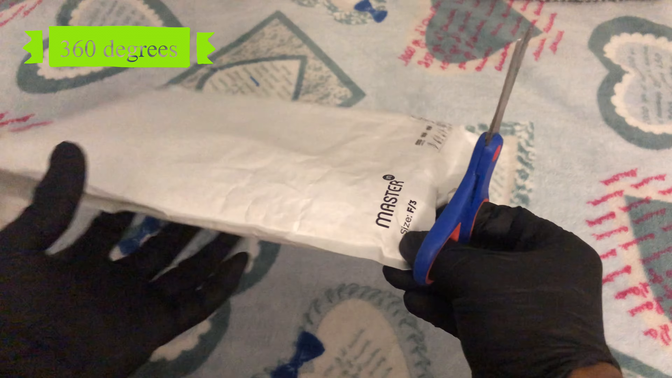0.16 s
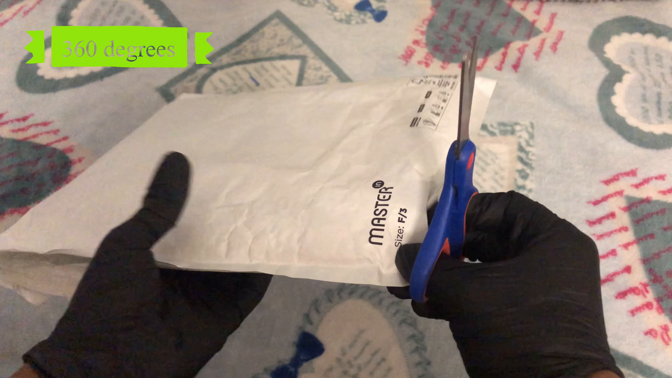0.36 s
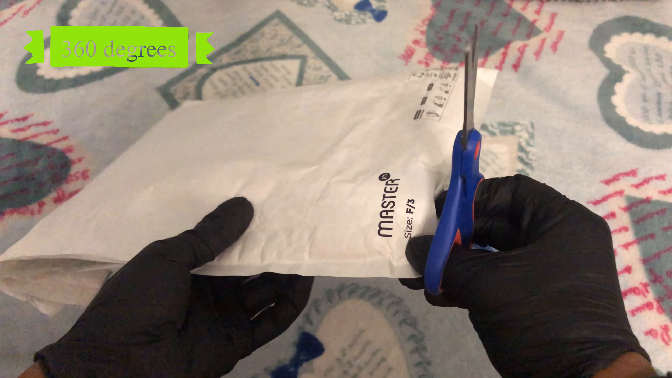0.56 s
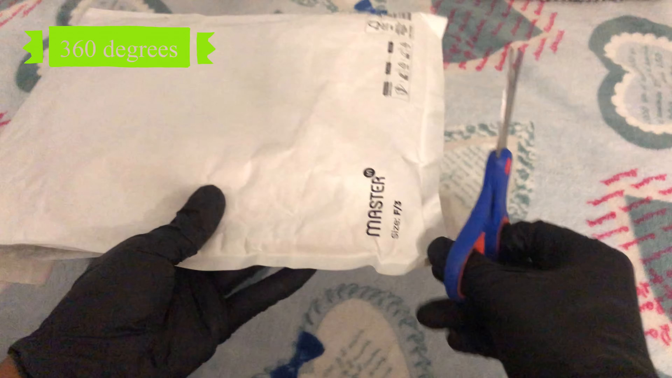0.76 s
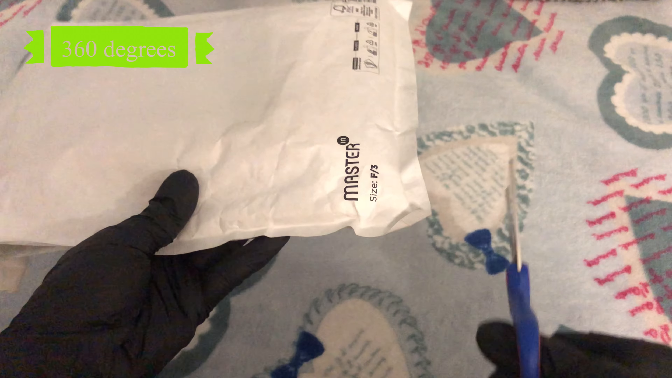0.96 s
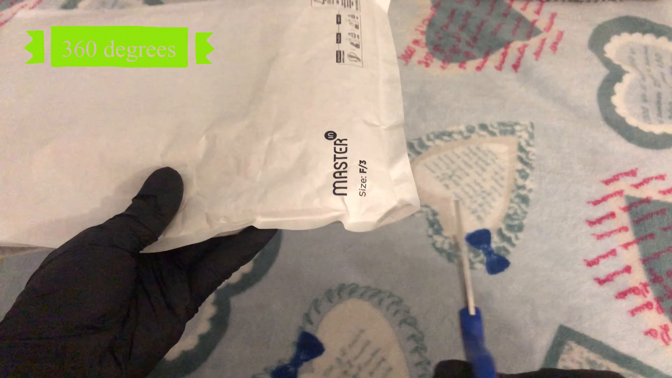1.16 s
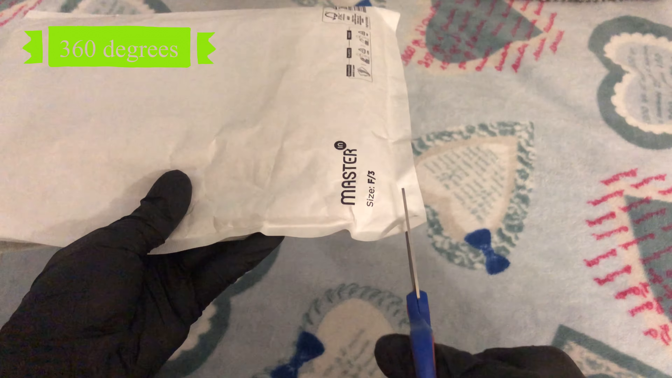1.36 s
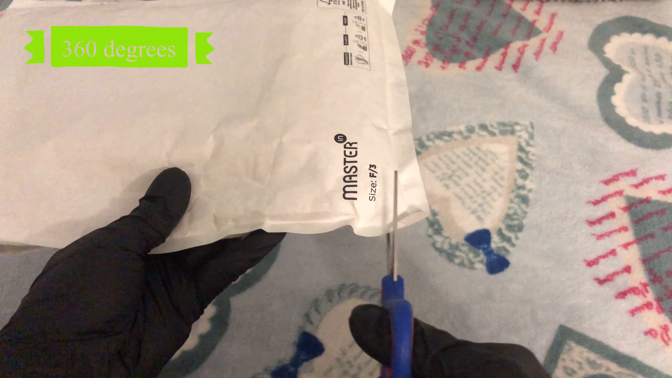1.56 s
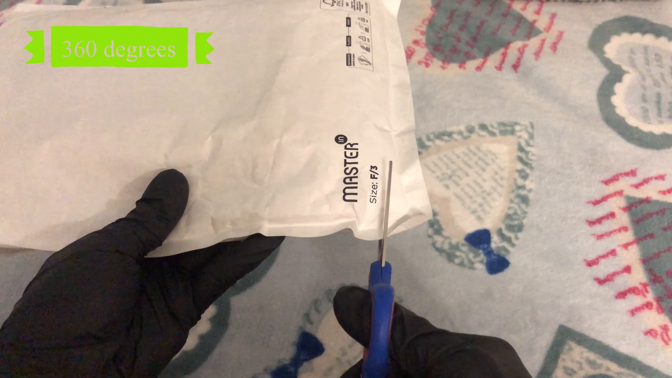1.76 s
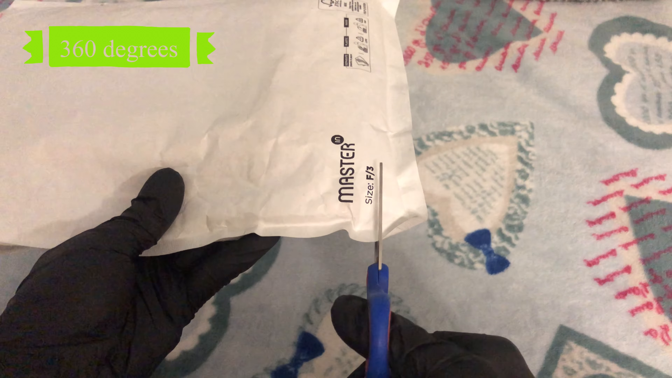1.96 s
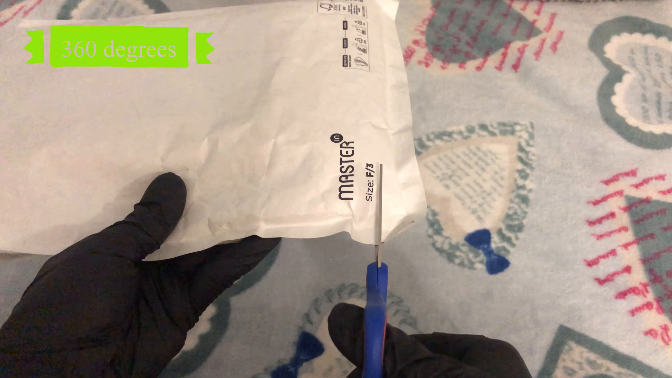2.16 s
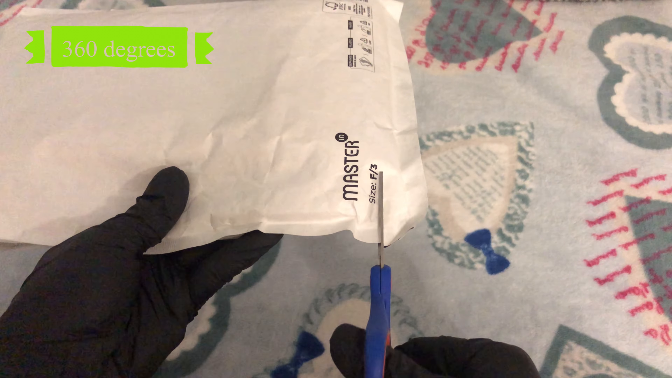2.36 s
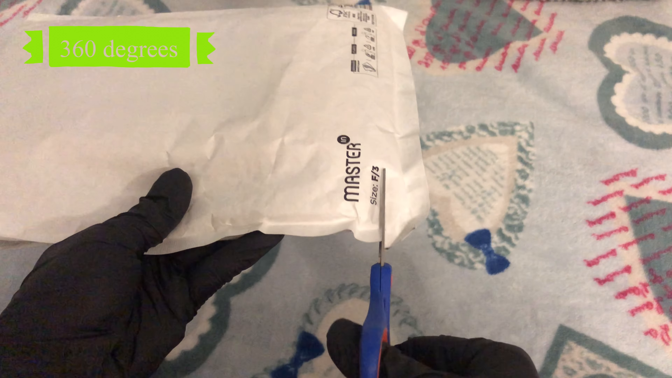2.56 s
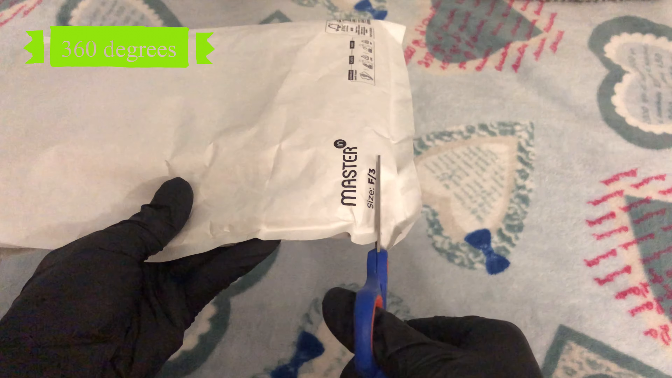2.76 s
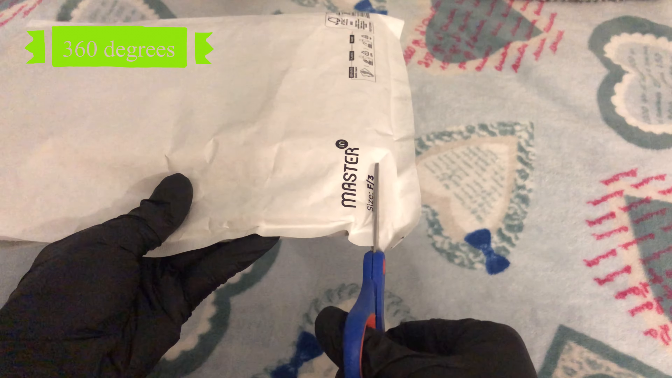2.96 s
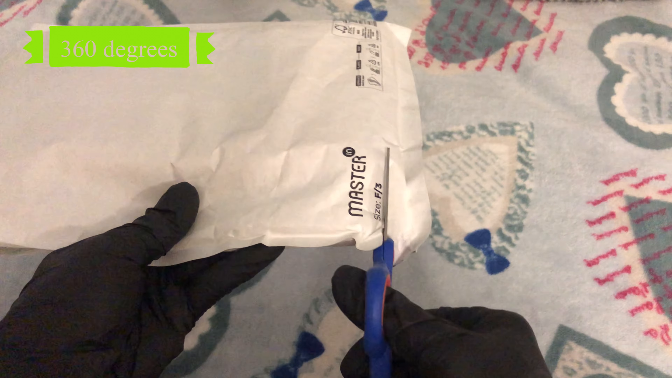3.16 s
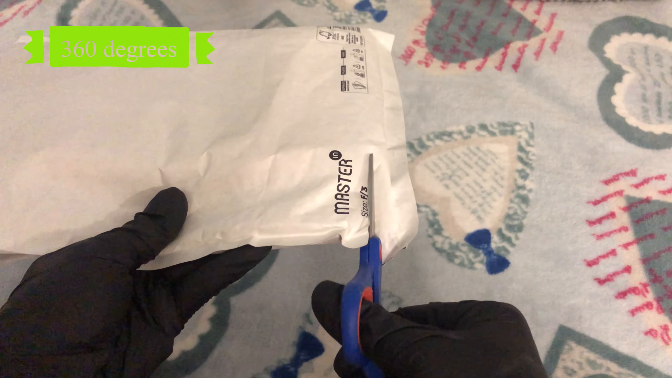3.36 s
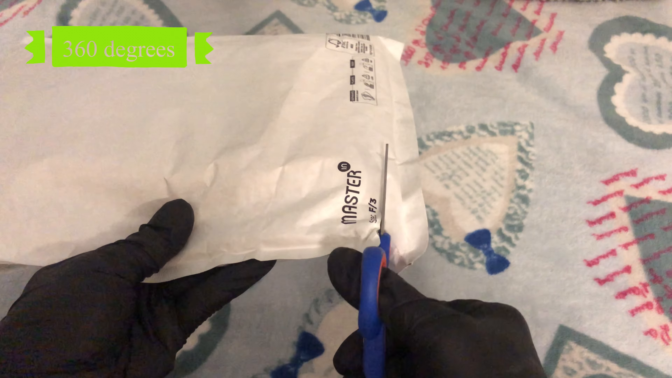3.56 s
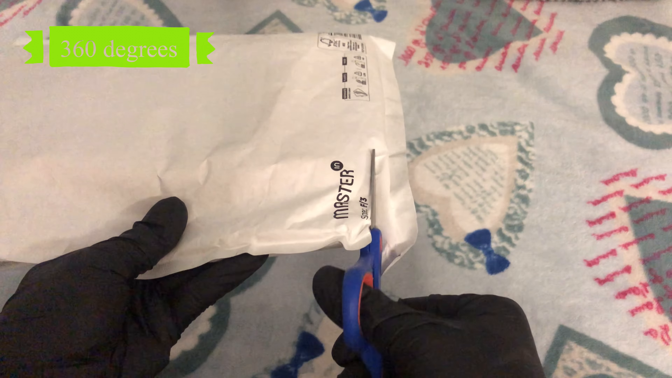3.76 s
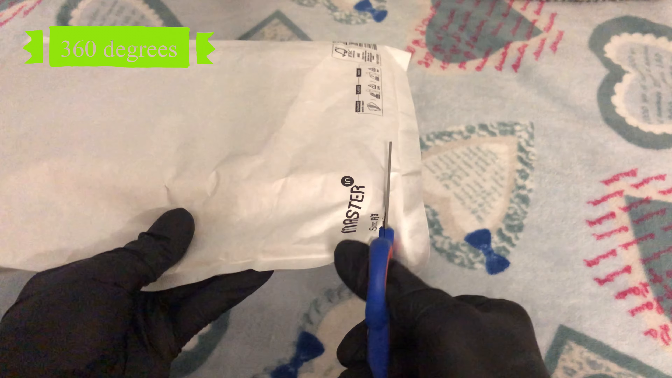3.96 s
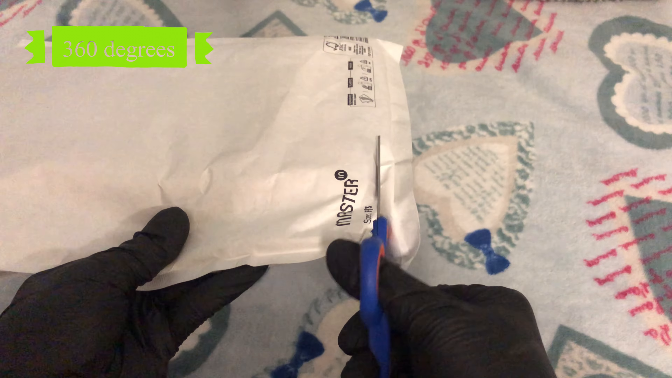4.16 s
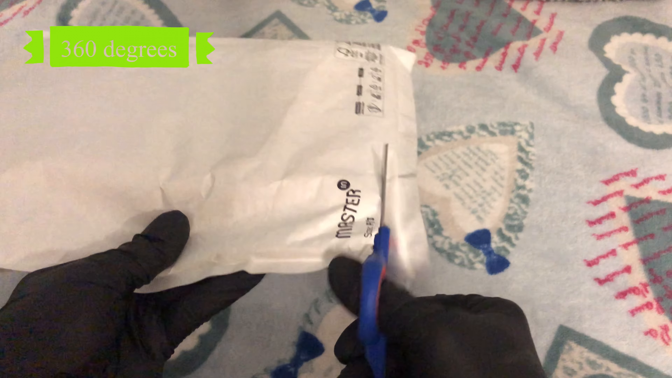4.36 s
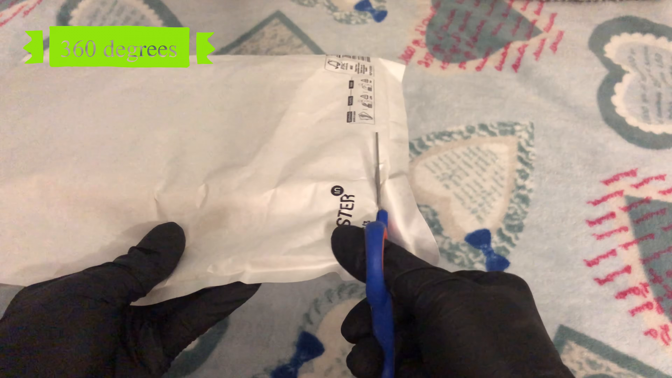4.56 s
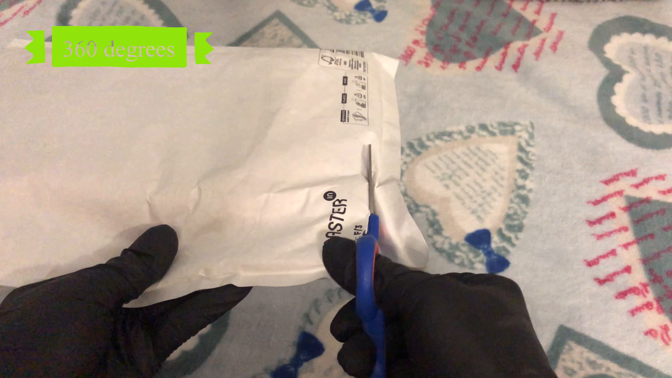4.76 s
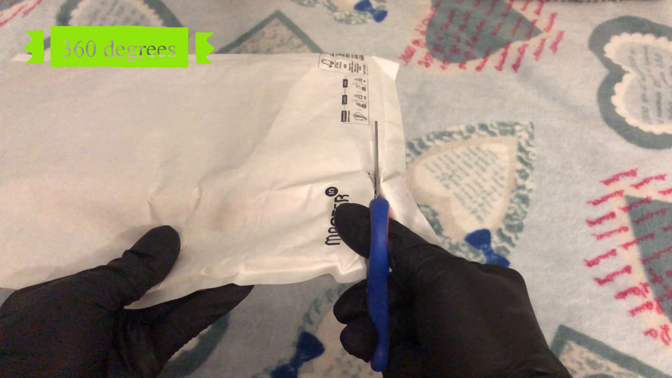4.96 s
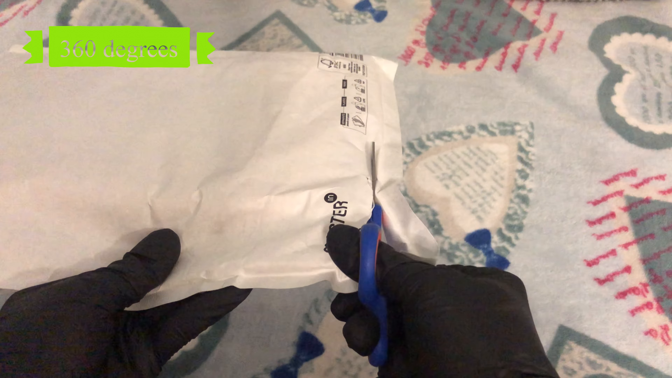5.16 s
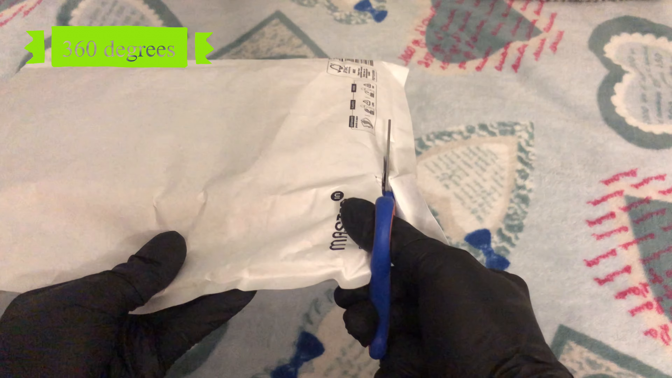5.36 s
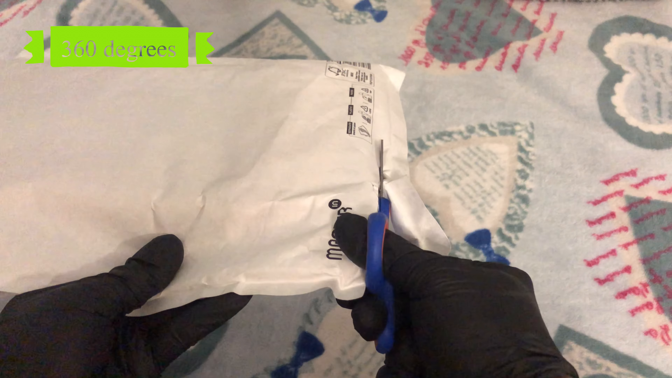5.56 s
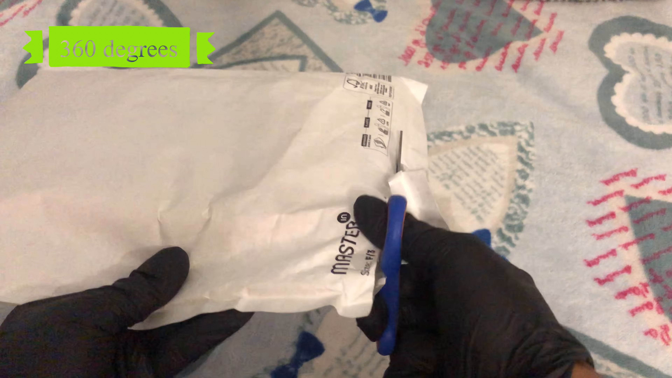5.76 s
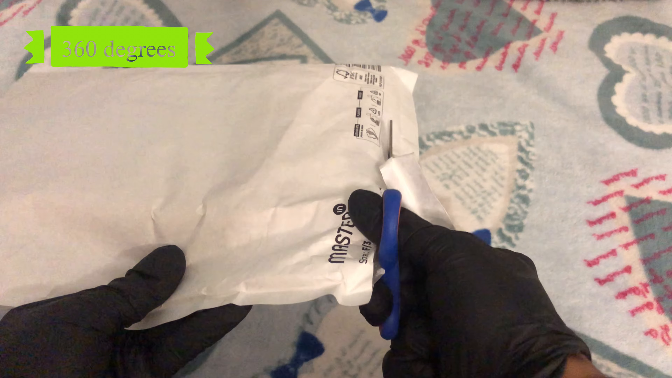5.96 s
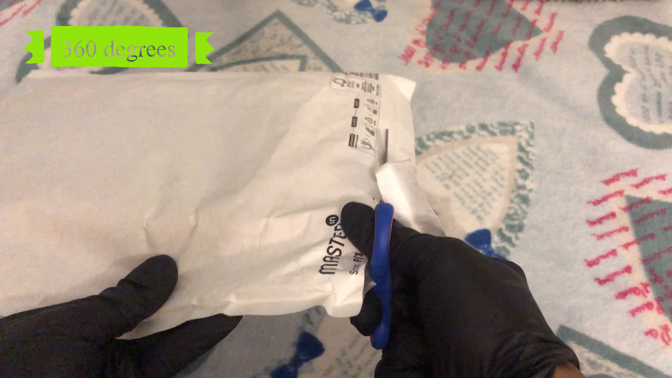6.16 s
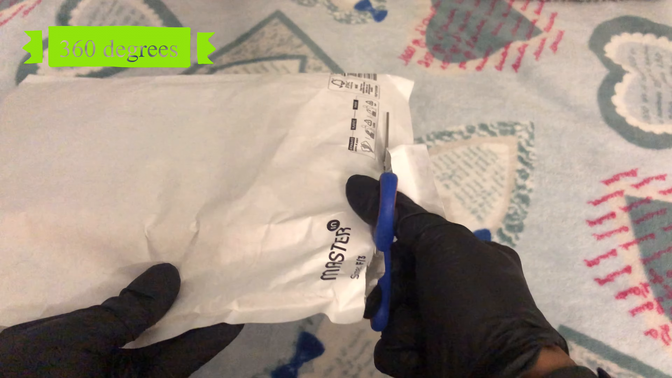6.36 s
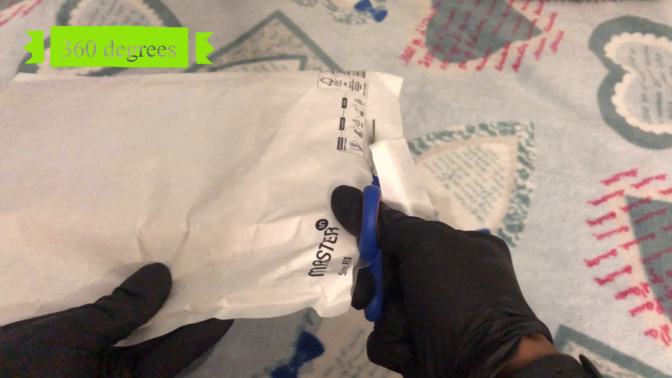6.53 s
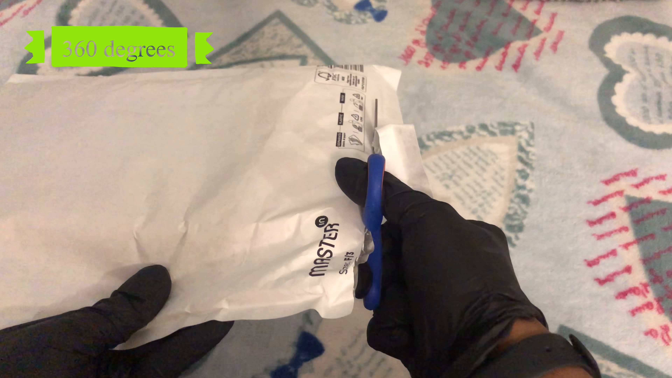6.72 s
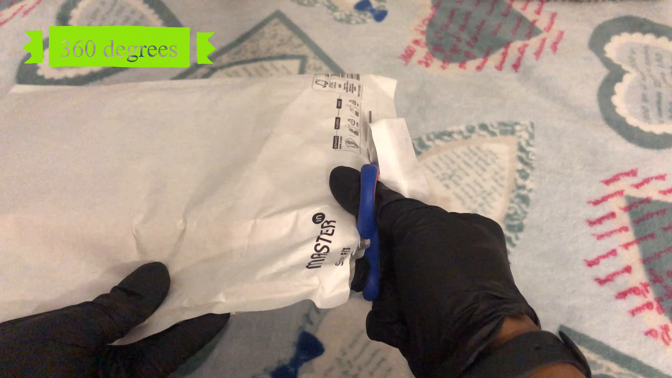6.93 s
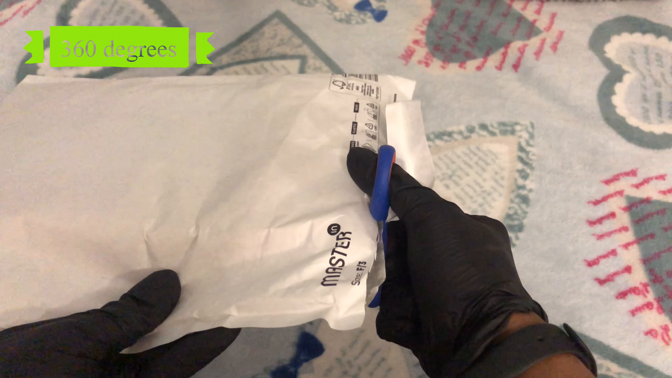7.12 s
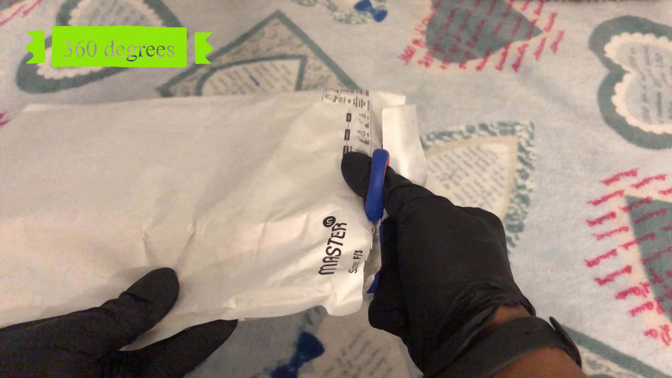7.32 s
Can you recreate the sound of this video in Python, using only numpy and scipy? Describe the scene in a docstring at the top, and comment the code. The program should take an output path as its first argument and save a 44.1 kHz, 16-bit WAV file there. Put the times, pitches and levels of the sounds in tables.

```python
"""Scissors cut open a padded paper mailer over a quilt, after gloved hands have turned it over.
Each closing of the blades shears paper and bubble film in a dense crunch. Creases buckle with sharp
snaps whose low part travels slowly through the sheet and arrives late. Before the cutting, the pivot
creaks once and the blades scrape the rim. The film ticks faintly, all in a quiet, soft room."""
import sys
import numpy as np
from scipy import signal
from scipy.fft import rfft, irfft, next_fast_len
from scipy.io import wavfile

SR = 44100
rng = np.random.default_rng(int(sys.argv[2]) if len(sys.argv) > 2 else 0)


def transcribe(signal):
    """Save signal, clipped to [-1, 1], as a 16-bit WAV file at the path in sys.argv[1]."""
    frames = np.atleast_2d(signal).T
    limited = np.clip(frames, -1, 1)
    pcm = np.round(limited * 32767).astype(np.int16)
    wavfile.write(sys.argv[1], SR, pcm)


N = 330309
GRAIN = 1024   # samples in one snap
BEND_LAG_S = 0.002166   # scales how far low notes trail high ones in the sheet

# Closings of the blades. Crunch is the middle range, thud the low range, sizzle the high range.
# bite t/s, hold/s, crunch level/dB, thud over crunch/dB, sizzle over crunch/dB, air pocket f/Hz
STROKES = [(1.586, 0.043, -65, -29, -3, 454), (2.117, 0.018, -56.5, -6, -2, 620),
           (2.196, 0.056, -62, -8, 2.5, 634), (2.294, 0.11, -53.5, -9, 2.5, 543),
           (2.566, 0.072, -42.5, -6.5, 2, 660), (2.806, 0.096, -47.5, -4, 3.5, 720),
           (3.045, 0.041, -41, -6, 2.5, 680), (3.249, 0.11, -47, -6, 2.5, 640),
           (3.459, 0.074, -45, -9, 4, 716), (3.67, 0.1, -44.5, -6, 1.5, 460),
           (3.906, 0.039, -38, -8.5, 3, 710), (4.165, 0.079, -43, -5, 2, 460),
           (4.357, 0.061, -43.5, -5.5, 4, 570), (4.575, 0.054, -41.5, -7, 2.5, 440),
           (4.775, 0.074, -49.5, -3.5, 4.5, 760), (5.035, 0.067, -40.5, -5, 4, 490),
           (5.22, 0.079, -47, -2.5, 4.5, 770), (5.537, 0.0, -29.5, -7, 4.5, 337),
           (5.692, 0.06, -46, -5.5, 3.5, 784), (5.934, 0.079, -50.5, -2, 5, 480),
           (6.145, 0.071, -46.5, -6.5, 5, 520), (6.395, 0.0006, -32, -5, 3.5, 430),
           (6.572, 0.027, -44.5, -8, 4, 504), (6.837, 0.053, -46, -4, 3, 348),
           (7.022, 0.038, -43, -6.5, 5, 487), (7.257, 0.059, -43.5, -3.5, 5, 445),
           (7.452, 0.1, -43, -6, 3, 724)]


def from_db(db):
    """Turn decibels into a gain to multiply by."""
    return 10 ** (np.asarray(db) / 20)


def rms_one(x):
    """Scale x to an average strength (rms) of 1."""
    return x / np.sqrt(np.mean(x ** 2) + 1e-20)


def coloured(x, points):
    """Shape the tone of x with a curve of (f/Hz, level/dB) points; the result has rms 1."""
    size = next_fast_len(N)
    hz = np.maximum(np.arange(size // 2 + 1) * SR / size, 1)
    point_hz, point_db = np.transpose(points)
    gain = from_db(np.interp(np.log(hz), np.log(point_hz), point_db))
    return rms_one(irfft(rfft(x, size) * gain, size)[:N])


def drift(rate_hz):
    """A smooth random wander with rms 1."""
    r = np.exp(-2 * np.pi * rate_hz / SR)
    return rms_one(signal.lfilter([1], [1, -2 * r, r * r], rng.standard_normal(N + SR))[SR:])


def passed(x, kind, hz):
    """Keep the "low" part, the "high" part or one "band" of x."""
    return signal.sosfilt(signal.butter(2, hz, kind, fs=SR, output="sos"), x)


def ringing(x, pitch_hz, width):
    """Let x ring at a moving pitch; width is a share of that pitch."""
    ring, state, block = np.zeros(N), np.zeros(2), 256
    for i, hz in zip(range(0, N, block), pitch_hz[::block]):
        r = np.exp(-np.pi * width * hz / SR)
        feed = [(1 - r * r) / 2, 0, (r * r - 1) / 2]
        feedback = [1, -2 * r * np.cos(2 * np.pi * hz / SR), r * r]
        ring[i:i + block], state = signal.lfilter(feed, feedback, x[i:i + block], zi=state)
    return ring


def hush():
    """A faint, steady, low noise lies under everything."""
    # Tone of the hush: f/Hz, level/dB
    tone = [(18, -47), (30, -7), (153, -1.5), (889, -16.5), (1100, -12.5), (1390, -16), (6380, -28),
            (14400, -35), (16000, -61)]
    return from_db(-66) * coloured(rng.standard_normal(N), tone)


def room(x, fade_s=0.27):
    """The echo of a softly furnished room: a tail of noise that falls 60 dB in fade_s."""
    t = np.arange(SR // 2) / SR
    tail = passed(rng.standard_normal(len(t)), "low", 18000) * from_db(-60 * t / fade_s) * (t > .003)
    return signal.oaconvolve(x, tail / np.sqrt(np.sum(tail ** 2)))[:N]


def buckle(noise, decay_s):
    """A crease gives way in a short dying rattle."""
    return noise * np.exp(-np.arange(GRAIN) / SR / decay_s)


def film_ticks(typical_per_s=70):
    """The held film keeps settling in clumps of faint, bright ticks of uneven size."""
    born = rng.random(N) < typical_per_s * from_db(5 * drift(8)) / SR
    sizes = from_db(-54 + 2.9 * rng.standard_normal(N))
    pitch_index = rng.integers(0, 8, N)
    out = 0
    for k, hz in enumerate(np.geomspace(2800, 9000, 8)):
        tick = passed(buckle(rng.standard_normal(GRAIN), decay_s=0.00031), "band", [hz / 1.56, hz * 1.3])
        out += signal.oaconvolve(sizes * born * (pitch_index == k), tick / np.abs(tick).max())[:N]
    return out


def pivot_creak():
    """The blades stick and slip on their screw; each slip rings a little differently, over a rough rub."""
    # Slips of the pivot: t/s, level/dB
    slips = [(1.1539, -40.5), (1.1611, -41.5), (1.1675, -45), (1.1743, -45), (1.1806, -45), (1.188, -41),
             (1.2024, -42)]
    # Notes the scissors ring at: f/Hz, level added to the slip/dB, time to fall 60 dB/s
    notes = [(1850, -16, 0.012), (2130, -7, 0.011), (3120, 17, 0.0035), (4900, 4, 0.0024),
             (6800, 15, 0.0027)]
    at = [round(s * SR) for s, _ in slips]
    uneven_db = rng.normal(0, 2.4, (len(slips), len(notes)))
    ring = 0
    for (hz, db, fade_s), spread_db in zip(notes, uneven_db.T):
        clicks = np.zeros(N)
        clicks[at] = from_db(np.array(slips)[:, 1] + db + spread_db)
        r, w = from_db(-60 / (fade_s * SR)), 2 * np.pi * hz / SR
        ring += signal.lfilter([0, np.sin(w)], [1, -2 * r * np.cos(w), r * r], clicks + 1e-18)
    rubbing = np.zeros(N)
    rubbing[at[0]:at[-1] + GRAIN // 2] = from_db(-59)
    rub = passed(rubbing * rng.standard_normal(N), "band", [800, 7000])
    bright_edge = from_db(-16) * ring
    return passed(ring, "band", [1650, 2250]) + bright_edge + rub


def rim_scrapes(edge_s=0.002):
    """Steel rubs the stiff rim: an uneven hollow rasp that starts and stops at once."""
    # The open blades slide onto the rim: t/s, length/s, level/dB
    slides = [(1.519, 0.012, -46.5), (1.541, 0.067, -43), (1.725, 0.06, -50.5)]
    # Tone of the rim: f/Hz, level/dB
    tone = [(120, -41), (200, -11), (448, -15.5), (1140, -2.5), (1480, -8), (1770, 0.5), (2250, -15),
            (2860, -11), (4520, -18), (7540, -22), (16000, -43)]
    t = np.arange(N) / SR
    rubbing = sum(from_db(db) * np.clip(np.minimum(t - s, s + length - t) / edge_s, 0, 1)
                  for s, length, db in slides)
    return rubbing * from_db(2.0 * drift(95)) * coloured(rng.standard_normal(N), tone)


def through_sheet(burst, lag_s):
    """Low notes travel more slowly through a bending sheet, so a burst leaves as a falling chirp."""
    hz = np.arange(GRAIN // 2 + 1) * SR / GRAIN
    delay = np.exp(-4j * np.pi * lag_s * (np.sqrt(1000 * hz) - hz / 9.4))
    return irfft(rfft(burst) * delay, GRAIN)


def pocket_hz():
    """The trapped air pocket changes pitch with the grip, stroke by stroke."""
    bite_s, *_, pitch_hz = np.transpose(STROKES)
    return np.interp(np.arange(N) / SR, bite_s, pitch_hz)


def mailer_body(x):
    """The rustle rings in the air pocket and in panels of the sheet, whose pitch wanders as they bend."""
    # Ringing panels: f/Hz, wander/octaves, width/share of pitch, level/dB
    panels = [(1547, 0.26, 0.12, 5), (4000, 0.29, 0.33, 1.5)]
    panel_ring = sum(from_db(db) * ringing(x, hz * 2 ** np.clip(octaves * drift(4.8), -1, 1), width)
                     for hz, octaves, width, db in panels)
    return x + panel_ring + 2 * from_db(-4) * ringing(x, pocket_hz(), width=0.43)


def crease_snaps(crack_cycles=0.44, film_s=0.0005):
    """Each crease gives a short crack with a faint rattle, a late air pocket thud and a tick of film."""
    # Buckling creases: t/s, crack level/dB, f/Hz, thud over crack/dB, tick over crack/dB
    creases = [(0.21, -23.5, 1260, -8, -11), (0.2362, -23.5, 2600, -4, -20), (0.2639, -29, 2080, -7, -22),
               (0.3627, -42, 905, 6, -15), (0.5536, -22, 2760, -38, -16), (0.5904, -36, 3400, -32, -12),
               (0.6103, -21, 1940, -9.5, -6), (0.6392, -26.5, 2540, -14, -23), (0.6728, -37, 2450, -24, -8),
               (0.6958, -35, 840, -1.5, -1), (0.7444, -21, 1940, -14, -7), (0.8452, -28.5, 1960, -15, -11),
               (0.8661, -24, 2440, -43, -4.5), (0.8894, -25, 1720, -8, -30), (0.985, -38.5, 1520, -6, -34),
               (1.2228, -36, 4420, -15, 0.5), (1.3639, -40.5, 5000, -30, -3), (1.485, -40, 3930, -27, -18),
               (1.6839, -39, 4300, -13.5, -11), (1.8348, -45, 2200, -8, -2), (2.021, -41, 3900, -36, -10),
               (2.0388, -43.5, 1880, -8, -18), (2.0529, -40.5, 2230, -9, -6),
               (2.1087, -33.5, 1650, -29, -9), (2.144, -18, 2430, -9, -42), (2.205, -39, 2230, -34, -21),
               (2.239, -40.5, 6730, -34, 1), (2.3457, -18.5, 4180, -28, 0.5), (2.3735, -30, 2450, -5, -11),
               (2.3849, -26, 1660, -18, -9), (2.5115, -29.5, 2200, -8, -33), (2.6238, -20.5, 3540, -16, -5),
               (2.7343, -23, 1520, -8, -20), (2.8103, -31, 1990, -21, -8), (2.8456, -18, 2270, -9.5, -3),
               (2.8618, -20.5, 3320, -9, -19), (2.9243, -27, 3280, -18, -19),
               (2.9823, -26, 1737, -4.5, -26), (3.1015, -22.5, 1820, -28, -6), (3.286, -12, 4040, -26, -48),
               (3.3579, -23.5, 3800, -22, -14), (3.444, -23.5, 4750, -35, -13),
               (3.4645, -25, 2900, -20, -26), (3.483, -22, 3860, -31, -32), (3.645, -24.5, 3230, -39, -41),
               (3.6512, -26.5, 5300, -28, -24), (3.736, -18.5, 4560, -51, -8),
               (3.7623, -30, 2380, -20, -28), (3.765, -26, 2970, -27, 2), (3.7676, -8, 3140, -26, -13.5),
               (4.183, -31, 2130, -13, -10), (4.2068, -10.5, 4000, -13, 3.5), (4.2111, -12, 2810, -27, -8),
               (4.2263, -13, 4300, -17.5, -8), (4.2415, -19.5, 2170, -21, 0.5),
               (4.5135, -24.5, 5100, -38, -13), (4.565, -10, 5600, -22, -33),
               (4.6097, -17.5, 3170, -27, -4), (4.6683, -24, 3260, -7, -10),
               (4.7078, -28.5, 1050, -1.5, -29), (4.7814, -25.5, 1570, -39, 1),
               (4.8207, -33.5, 760, -5, -13), (4.9453, -31, 2700, -20, -31), (4.9908, -23, 4900, -27, -23),
               (5.0058, -18, 4730, -32, -29), (5.0281, -19.5, 3850, -21, -36),
               (5.061, -5, 3120, -27.5, -8.5), (5.0819, -18, 3190, -23, -17), (5.089, -24, 2210, -32, -1),
               (5.1186, -14.5, 2413, -14, -6), (5.1213, -12.5, 3550, -20, -2), (5.148, -28.5, 1200, 1, -42),
               (5.2187, -29.5, 4210, -26, -6), (5.2787, -38.5, 880, 6, -10),
               (5.5091, -13.5, 2300, -19.5, -8), (5.513, -10.5, 2400, -22, -7.5),
               (5.5287, -29, 2620, -6, -24), (5.5386, -16, 2960, -30, -11), (5.57, -19.5, 2670, -12, -22),
               (5.6434, -23, 2720, -20, -4), (5.6767, -14.5, 4000, -24, 0), (5.7091, -19.5, 3550, -16, -8),
               (5.7133, -16.5, 6500, -33, -4), (5.8645, -30, 1580, -35, -28), (5.9304, -29, 1910, -6, -34),
               (5.9585, -19, 4900, -17, 3), (5.9626, -27, 1850, -20, -8), (6.1393, -31.5, 2260, -17, -15),
               (6.1946, -18.5, 4900, -37, -2), (6.223, -27.5, 2040, -14, -22),
               (6.3029, -30.5, 3530, -17, -29), (6.387, -22.5, 3650, -16, -19),
               (6.3904, -14.5, 4810, -17, -6), (6.3983, -15.5, 2730, -16, 4),
               (6.4251, -21.5, 3020, -16, -11), (6.5314, -29, 3380, -25, -16),
               (6.761, -30.5, 5100, -13.5, -15), (6.8286, -21.5, 4700, -20, -28),
               (6.8674, -19, 2750, -19, -8), (6.871, -13, 3700, -22, -5), (6.8803, -20.5, 2960, -12.5, -9),
               (7.021, -19, 5350, -46, -7), (7.0586, -33, 2500, -5, -2), (7.1877, -24.5, 1850, -7.5, -27),
               (7.2048, -30.5, 3770, -29, 1), (7.2371, -28.5, 2240, -12, -17), (7.257, -28, 2750, -18, -14),
               (7.283, -20, 2870, -12.5, -21)]
    out, pocket_pitch = np.zeros(N + GRAIN), pocket_hz()
    noises = rng.standard_normal((len(creases), 2, GRAIN))
    lags_s = BEND_LAG_S * rng.uniform(0.2, 0.72, len(creases))
    for (s, db, hz, thud_db, tick_db), (noise, rattle_noise), lag_s in zip(creases, noises, lags_s):
        rattle = from_db(-9) * rms_one(buckle(rattle_noise, decay_s=0.0083))
        wave = through_sheet(rms_one(buckle(noise, crack_cycles / hz)) + rattle, lag_s)
        wide = passed(wave, "band", [hz / 2.9, min(hz * 1.8, 9000)])
        crack = passed(wide, "band", [hz / 1.54, hz * 1.3]) + from_db(-5) * wide
        thud_hz = pocket_pitch[round(s * SR)]
        push = through_sheet(buckle(noise, decay_s=0.0042), lag_s)
        thud = passed(push, "band", [thud_hz / 1.98, thud_hz * 1.85])
        tick = passed(buckle(rattle_noise, film_s), "band", [5800, 11500])
        start = round(s * SR) - np.abs(crack).argmax()   # the crack peaks at time s
        tick_start = round((s - film_s) * SR)
        for part, over_db, at in (crack, 0, start), (thud, thud_db, start), (tick, tick_db, tick_start):
            out[at:at + GRAIN] += from_db(db + over_db) * part / np.abs(part).max()
    return passed(out[:N], "low", 11800)


def tearing_fibres(typical_per_s=2500):
    """Fibres and film tear in clumps of tiny buckles at many pitches."""
    sizes = from_db(5.5 * np.minimum(rng.exponential(1, N), 3.8)) * rng.choice([-1, 1], N)
    born = rng.random(N) < typical_per_s * from_db(5 * drift(40)) / SR
    pitch_index = rng.integers(0, 24, N)
    out = 0
    for k, hz in enumerate(np.geomspace(300, 11000, 24)):
        burst = buckle(rng.standard_normal(GRAIN), decay_s=0.0015 * np.sqrt(1000 / hz))
        grain = passed(through_sheet(burst, 0.451 * BEND_LAG_S), "band", [hz / 2.3, min(hz * 2.7, 18000)])
        out += signal.oaconvolve(sizes * born * (pitch_index == k), grain)[:N]
    return rms_one(out)


def hand_effort(flex_rise_db_per_s=300, flex_fall_db_per_s=249):
    """How hard the blades rasp and the sheet flexes: a pair of gains each for crunch, thud and sizzle."""
    # The mailer is turned, then held: t/s, crunch level/dB, thud over crunch/dB, sizzle over crunch/dB
    turning = [(0.0, -46, -7, 0.5), (0.122, -43, -3.5, 1), (0.188, -51.5, -2.5, -1), (0.216, -48.5, 6, 5),
               (0.29, -57, 7, 0.5), (0.325, -46.5, 1.5, 2), (0.416, -51.5, -1.5, 1),
               (0.668, -43.5, -0.5, 1), (0.818, -48.5, -11.5, -1.5), (0.894, -51, -4, 3),
               (0.94, -50.5, -3, -2), (0.97, -56.5, 6.5, 0), (1.032, -48, -8, 2.5), (1.108, -76, 2, 5.5),
               (2.0, -81, 0, -4), (2.3, -64.5, -4.5, 2.5)]
    t = np.arange(N) / SR
    coarse_t = t[::32]
    turn_s, *columns = np.transpose(turning)
    turn_db, turn_thud_db, turn_sizzle_db = [np.interp(t, turn_s, column) for column in columns]
    bite_s, hold_s, stroke_db, thud_db, sizzle_db, _ = np.transpose(STROKES)[:, :, None]
    early_s, late_s = np.maximum(bite_s - coarse_t, 0), np.maximum(coarse_t - bite_s - hold_s, 0)

    def swells(db, rise_db_per_s, fall_db_per_s):
        """Each stroke grows up to its bite, holds, then fades."""
        gains = from_db(db - rise_db_per_s * early_s - fall_db_per_s * late_s)
        return np.interp(t, coarse_t, gains.sum(axis=0))

    def flex(over_db, turn_over_db):
        """The sheet flexes around each stroke and while it is turned."""
        around_strokes = swells(stroke_db + over_db, flex_rise_db_per_s, flex_fall_db_per_s)
        return around_strokes + from_db(turn_db + turn_over_db)

    return [(swells(stroke_db, 608, 530), flex(0.5, 0)),
            (swells(stroke_db + thud_db, 472, 349), flex(thud_db, turn_thud_db)),
            (swells(stroke_db + sizzle_db, 637, 546), flex(sizzle_db - 4.5, turn_sizzle_db))]


def cutting_crunch(thud_top_hz=1044, sizzle_from_hz=2120):
    """The blades shear the sheet and it flexes: both are tiny tears over a fine rub, in the mailer."""
    tears = tearing_fibres()
    sheet_rub = from_db(-3.0 + 1.17 * drift(86)) * rng.standard_normal(N)
    blade_rub = from_db(3.5 * drift(39)) * rng.standard_normal(N)
    # Tones of the shearing blades and of the flexing sheet: f/Hz, level/dB
    rasp_tone = [(35, -42), (60, -17), (300, -11), (924, -7.5), (1170, -10), (1910, -3), (2770, 2),
                 (4530, -5), (11300, -12), (16000, -27)]
    sheet_tone = [(35, -61), (60, 4), (180, 11), (448, 2.5), (903, 13), (1660, -7), (2770, 10.5),
                  (3040, 13), (4800, 26.5), (6580, 26), (10300, 12), (14900, 2), (16000, 9)]
    rasp = mailer_body(coloured(blade_rub + from_db(-2) * tears, rasp_tone))
    flex = mailer_body(coloured(sheet_rub + tears, sheet_tone))
    bands = ("band", [thud_top_hz, sizzle_from_hz]), ("low", thud_top_hz), ("high", sizzle_from_hz)
    return sum(rasp_gain * rms_one(passed(rasp, *band)) + flex_gain * rms_one(passed(flex, *band))
               for band, (rasp_gain, flex_gain) in zip(bands, hand_effort()))


def scene():
    """The scissors and mailer, their faint echo and the hush, in one channel."""
    near = cutting_crunch() + crease_snaps() + rim_scrapes() + film_ticks() + pivot_creak()
    return (near + from_db(-17) * room(near) + hush())[None]


def record(dry):
    """The microphone drops the deepest bass; the very top is cut."""
    dry = passed(dry, "high", 13)
    return signal.sosfilt(signal.cheby2(12, 60, 16377, fs=SR, output="sos"), dry)


dry = scene()
out = record(dry)
transcribe(out)
```